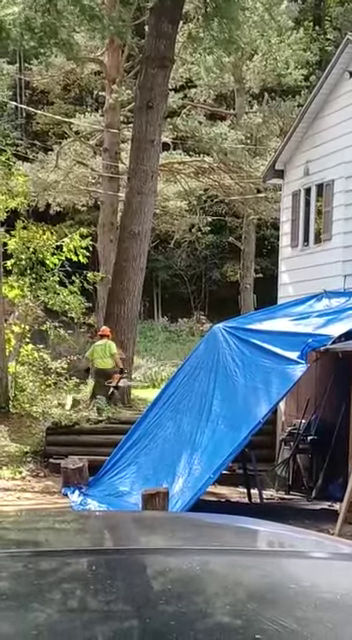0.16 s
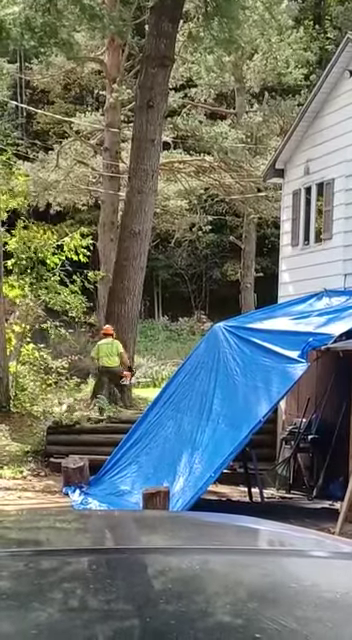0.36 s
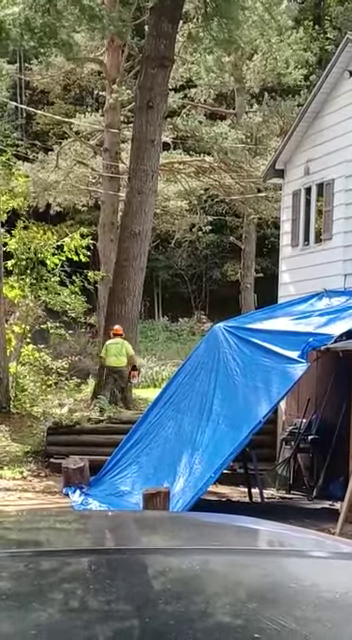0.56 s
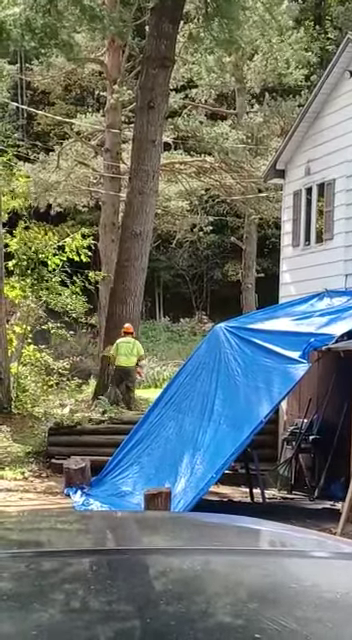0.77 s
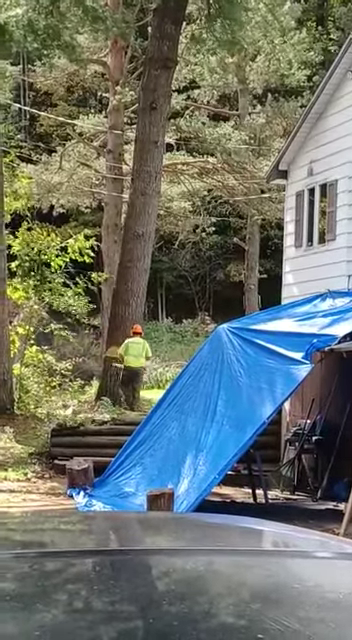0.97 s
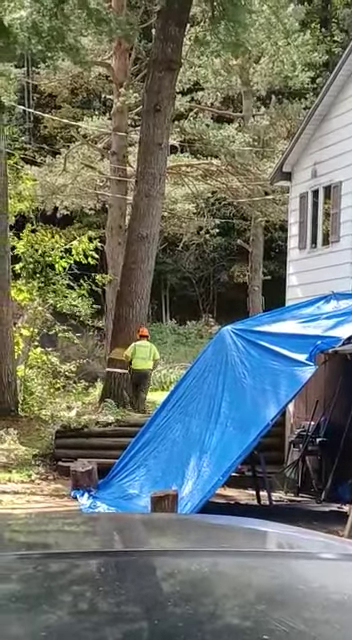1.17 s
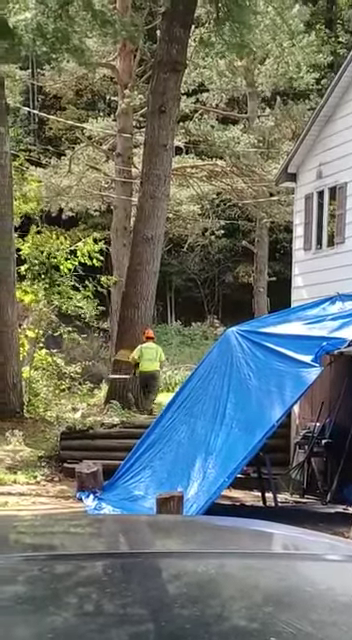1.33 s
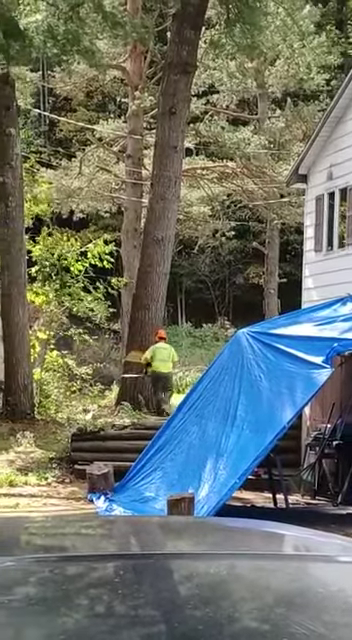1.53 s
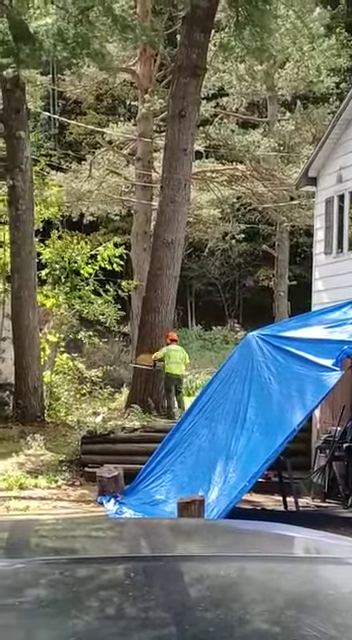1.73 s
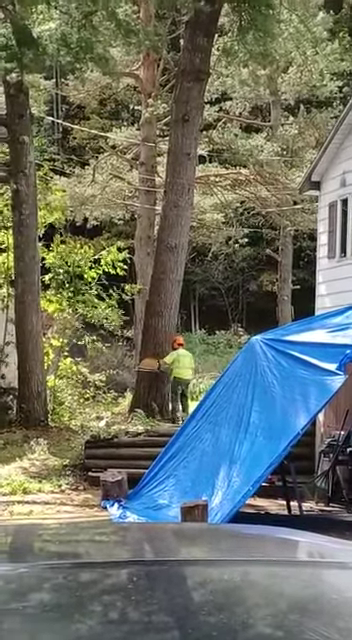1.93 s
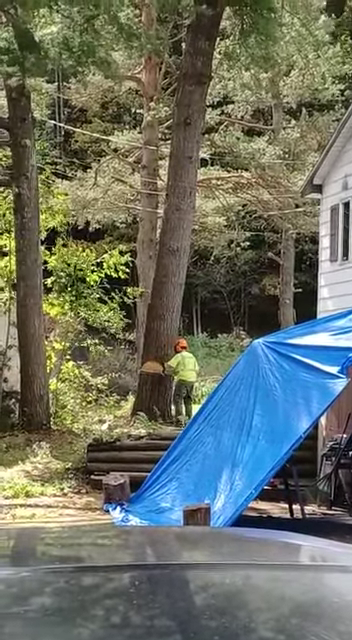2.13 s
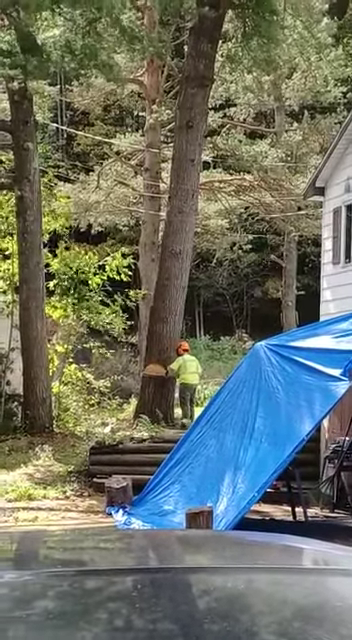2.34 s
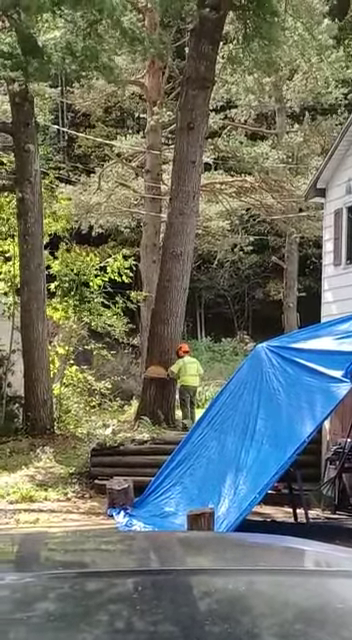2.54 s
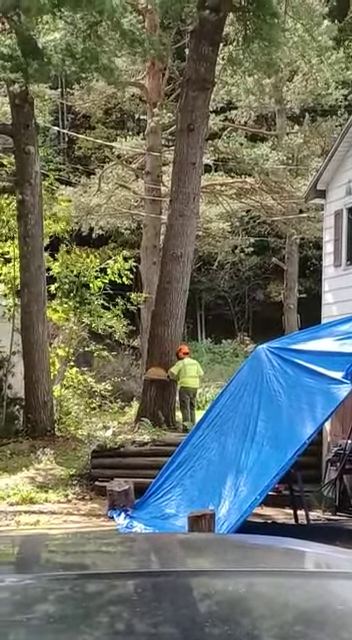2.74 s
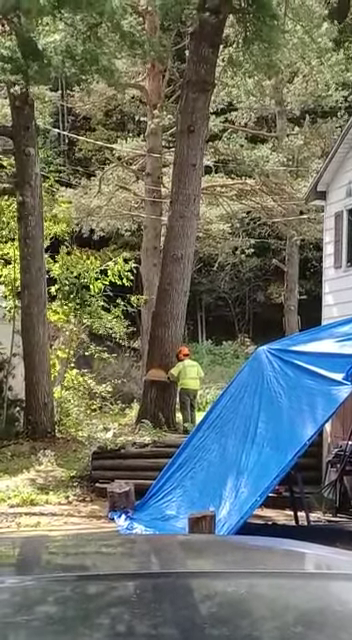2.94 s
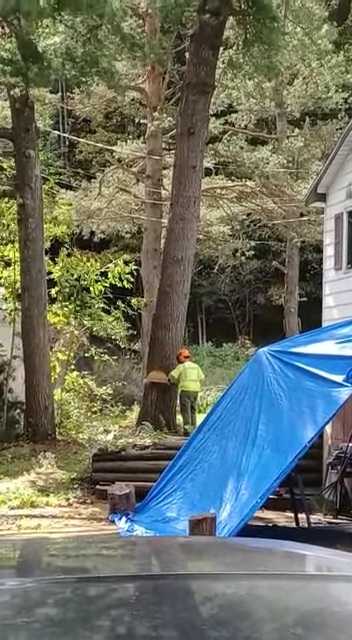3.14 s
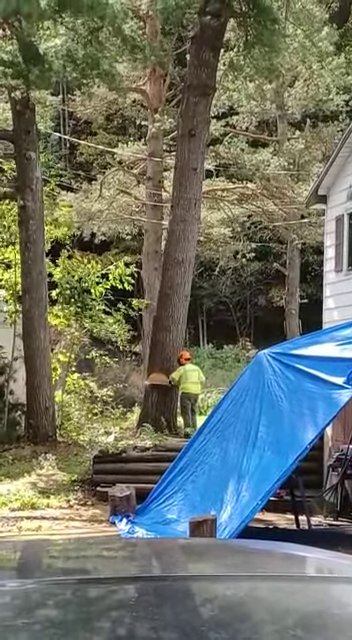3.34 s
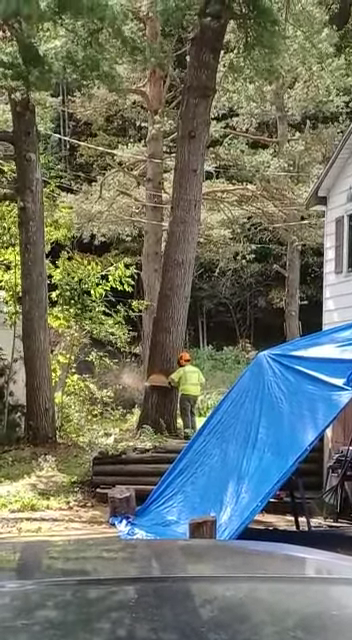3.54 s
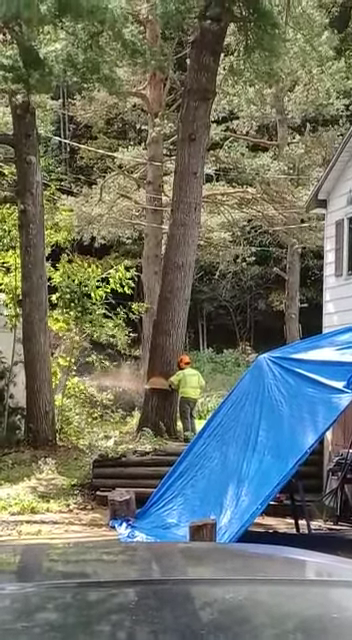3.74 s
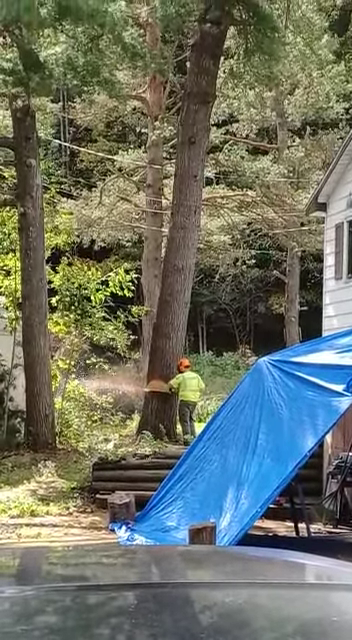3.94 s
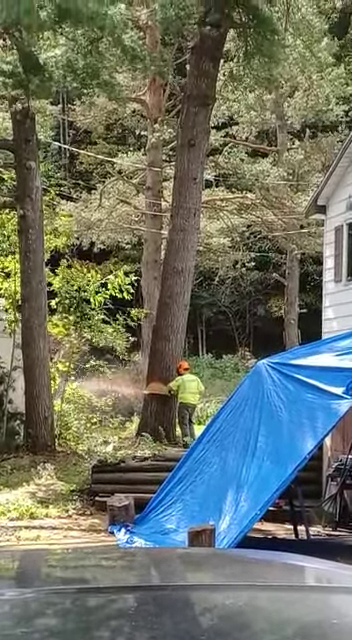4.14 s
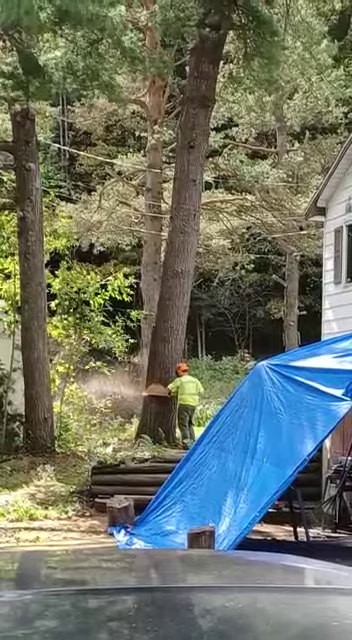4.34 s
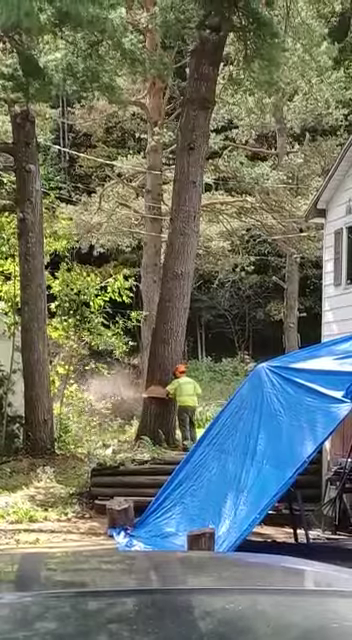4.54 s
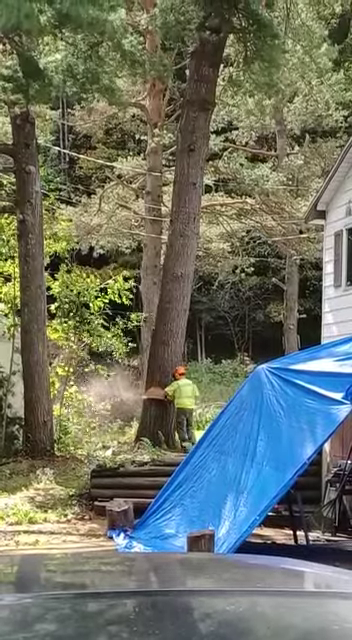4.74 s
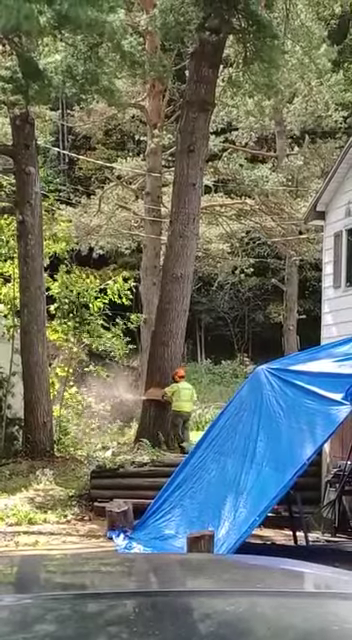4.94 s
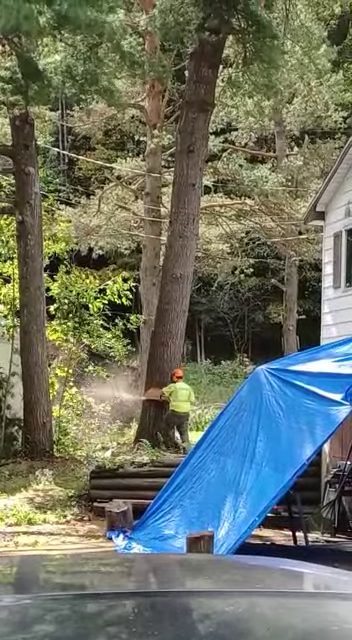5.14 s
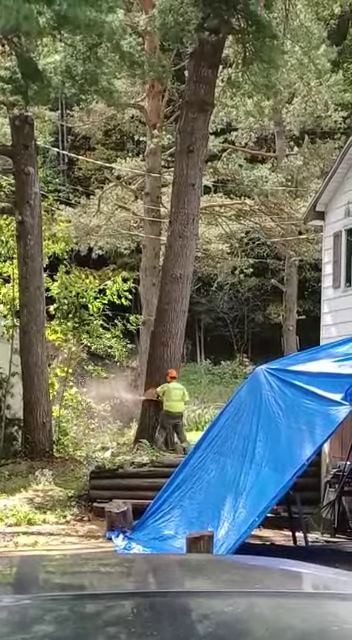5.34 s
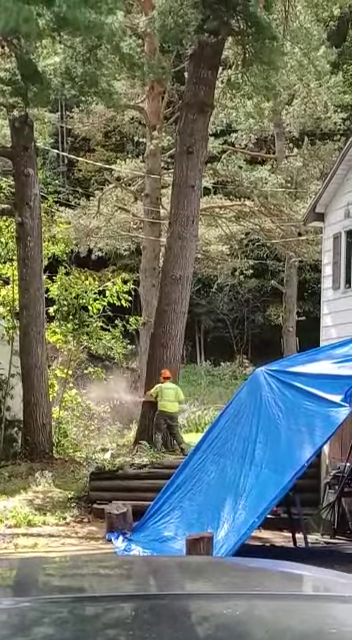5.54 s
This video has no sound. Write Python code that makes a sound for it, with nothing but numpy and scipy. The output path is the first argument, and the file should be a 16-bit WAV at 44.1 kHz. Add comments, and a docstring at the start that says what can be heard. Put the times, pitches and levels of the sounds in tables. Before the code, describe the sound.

A chainsaw some way off among trees idles, revs in four short blips, then cuts into a trunk at full throttle.

```python
"""A two-stroke chainsaw, some way off among trees, idles unevenly, its chain rattling on the bar.
Just after 2 s the engine catches with a pop and is revved in four short blips.
From about 3.2 s the throttle is held open and the chain bites into a trunk with a gritty hiss.
Late in the cut the wood pinches the chain and it squeals.
All along, the trees scatter the sound on its way to a phone with two microphone ports."""
import sys
import numpy as np
from scipy import signal
from scipy.fft import rfft, irfft, next_fast_len
from scipy.io import wavfile
from scipy.ndimage import uniform_filter1d, map_coordinates

SR = 44100
rng = np.random.default_rng(int(sys.argv[2]) if len(sys.argv) > 2 else 0)


def waveform_to_disk(signal):
    """Save audio, clipped to [-1, 1], as 16-bit WAV at the path in sys.argv[1]."""
    frames = np.transpose(np.atleast_2d(signal))
    scaled = np.clip(frames, -1, 1) * 32767
    samples = np.round(scaled).astype(np.int16)
    wavfile.write(sys.argv[1], SR, samples)


N = 251356
TIME_S = np.arange(N) / SR


def saw():
    """The whole saw: it idles until the first blip, then revs and cuts."""
    revved = np.clip((TIME_S - BLIPS[0][0]) / 0.0026, 0, 1)
    return (1 - revved) * idle() + jerks() + pop() + revved * (revving() + squeal())


# how far the chain is sunk in the wood: time_s, share (0-1)
BITE = [(3.22, 0.1), (3.6, 1)]
# loudness of each layer, by name: level_db at 150 Hz, rise_db_per_octave, throttle_shut_loss_db,
# in_wood_loss_db
LAYERS = {"bark": (-30.5, 4, 6.5, 1), "roar": (-34, 1, 1.5, 2.5), "honk": (-34, 4, 3, 10.5),
          "rasp": (-25.5, 9, 3, 2.5), "whine": (-32, 9, 0, 1)}
# tone of the whine: pitch_hz, level_db
WHINE = [(1200, -25.5), (1750, -8), (2200, -7), (2650, 2), (3100, -1.5), (3500, 2.5), (3800, -3), (4300, 2),
         (4700, -8), (5400, -6.5), (7000, -17)]
def revving():
    """The engine fires once a turn: it drones, barks and whines while the chain rasps."""
    speed_hz = shaft_speed()
    opening, strength_db = throttle()
    bite, = curves(BITE)
    level = {name: amp(db + per_octave * np.log2(speed_hz / 150) - shut * (1 - opening) - sunk * bite)
             for name, (db, per_octave, shut, sunk) in LAYERS.items()}
    turns = np.cumsum(speed_hz * (1 + .001 * wobble(30))) / SR
    # speeding up loads the engine and pulls the chain taut, fully at 80 Hz a second
    pull = np.clip(uniform_filter1d(np.gradient(speed_hz) * SR, SR // 16) / 80, 0, 1)
    # out of the wood the engine fires less evenly
    firing = overtones(turns, smear=.75) * amp((2.5 - 1.5 * bite) * wobble(120))
    engine = drone(turns, speed_hz, opening, bite) + exhaust(firing, turns, speed_hz, level, pull)
    whine = level["whine"] * coloured(firing + .6 * scattered(firing), WHINE)
    rasp = level["rasp"] * cutters(turns, pull)
    # the deepening cut swallows the chain's noise, 2.5 dB a second
    muffle = amp(-2.5 * np.maximum(TIME_S - BITE[-1][0], 0))
    bar_ring = amp(-35.5 - .9 * bite) * guide_bar(puffs(turns, depth_db=3))
    return amp(strength_db) * engine + muffle * (whine + rasp) + bite * sprocket(turns) + bar_ring


# engine speed with the throttle held open: time_s, speed_hz
CUT_SPEED = [(3.17, 116.4), (3.31, 152.1), (3.38, 166.6), (3.44, 171.7), (3.5, 183.9), (3.58, 194),
             (3.69, 193), (4.03, 183.5), (4.32, 193.3), (4.55, 197.3), (4.9, 219.3), (4.99, 221.1),
             (5.17, 222.4), (5.29, 214.7), (5.43, 218), (5.69, 205.4)]
def shaft_speed():
    """Turns a second: the shaft speeds up in each blip, coasts down, and at last pulls into the cut."""
    first_hz, overrun_s, coast_hz_per_s = 66.03, .02, 120
    open_s, shut_s, top_hz, *_ = np.transpose(BLIPS)
    top_s = shut_s + overrun_s
    low_hz = np.r_[first_hz, top_hz[:-1] - coast_hz_per_s * (open_s[1:] - top_s[:-1])]
    return curves(sorted([*zip(open_s, low_hz), *zip(top_s, top_hz), *map(tuple, CUT_SPEED)]))[0]


# short squeezes of the throttle: open_s, shut_s, top_speed_hz, strength_db, rise_s
BLIPS = [(2.155, 2.268, 87.02, 1, 0.0092), (2.382, 2.502, 127.1, 1.5, 0.038),
         (2.681, 2.776, 125.8, -1, 0.053), (2.926, 3.03, 134.1, -1, .045)]
def throttle():
    """How far the throttle is open (0-1), and how much each blip adds to the engine in dB."""
    open_s, shut_s, _, strength_db, rise_s = np.transpose(BLIPS)
    rising = np.clip((TIME_S[:, None] - open_s) / rise_s, 0, 1)
    falling = np.clip(1 - (TIME_S[:, None] - shut_s) / 0.034, 0, 1)
    blips = rising * falling
    held = np.clip((TIME_S - CUT_SPEED[0][0]) / .033, 0, 1)
    return blips.sum(axis=1) + held, blips @ strength_db


# low tones at 1, 2 and 4 times the shaft speed, throttle open: speed_hz, level_db
TONE_1 = [(68, -50), (88, -33), (108, -22), (130, -22), (151, -35), (169, -25), (183, -28), (193, -21.5),
          (222, -21.5)]
TONE_2 = [(70, -39), (88, -39.5), (115, -32), (150, -39), (184, -26.5), (193, -32), (199, -25), (206, -31),
          (222, -22.5)]
TONE_4 = [(75, -54), (113, -34.5), (135, -44), (160, -30.5), (170, -43), (185, -33), (194, -35), (197, -39),
          (208, -27.5), (217, -32.5), (222, -46)]
def drone(turns, speed_hz, opening, bite):
    """The engine's low tones swell and fade as they slide through fixed resonances."""
    tones = sum(amp(along(table, speed_hz)) * np.sqrt(2) * np.cos(2 * np.pi * k * turns)
                for k, table in ((1, TONE_1), (2, TONE_2), (4, TONE_4)))
    return tones * amp(-9 * (1 - opening) + 1.12 * (1.5 - bite) * wobble(60))


def overtones(turns, smear):
    """The higher tones of the firing, each wavering on its own; smear spreads the pulse out."""
    stack = 0
    for k in (3, *range(5, 37)):
        swell = amp(2.5 * wobble(7))
        stack += swell * np.cos(2 * np.pi * (k * turns + smear * rng.random()) + .22 * wobble(50))
    return unit(stack * np.sqrt(np.gradient(turns)))


# tone of the exhaust's bark, roar and growl: pitch_hz, level_db
BARK = [(130, -19), (218, 21), (280, -5), (370, -4), (440, 13), (560, -4.5), (650, -0.5), (760, 2),
        (950, -2), (1130, -7), (1300, -4), (1600, -8.5), (5000, -64)]
ROAR = [(30, -55), (80, -8), (400, -6.5), (800, 0.5), (950, 1), (1120, 6), (1400, -10), (2000, -5),
        (3000, -5), (6000, -14)]
GROWL = [(520, -25), (680, 1), (850, 1.5), (1180, -4), (1400, -9.5), (1700, -27), (2500, -7), (3200, -17)]
# where the muffler's shell rings: pitch_hz, width_hz, level_db
MUFFLER_SHELL = [(1126, 72, 2.5), (800, 150, -7.5)]
def exhaust(firing, turns, speed_hz, level, pull):
    """Exhaust pulses bark, roar and make the muffler honk; they growl near one shaft speed."""
    growl_hz, growl_width_hz = 167.4, 14
    bark = level["bark"] * coloured(firing + .5 * scattered(firing), BARK)
    roar = level["roar"] * coloured(puffs(turns, depth_db=-6), ROAR)
    honk = level["honk"] * unit(resonant(firing + .6 * puffs(turns, depth_db=5), MUFFLER_SHELL))
    nearness = np.exp(-((speed_hz - growl_hz) / growl_width_hz) ** 2)
    growl = nearness * amp(-29.5) * coloured(firing, GROWL)
    return amp(0.5 * pull) * (bark + roar + honk) + growl


def pop():
    """The first full charge of fuel fires with a pop as the throttle opens."""
    burst = bursts(np.array([BLIPS[0][0] + .004]), [-35], rise_s=0.0025, fade_s=0.21)
    return burst * (coloured(rng.standard_normal(N), ROAR) + 1.6 * guide_bar(rng.standard_normal(N)))


# tone of the chain's rasp and of its steely zing: pitch_hz, level_db
RASP = [(900, -25), (1900, -6.5), (2300, -9), (2550, -4.5), (3300, -6.5), (4200, -2.5), (5200, -3),
        (6500, -7), (8000, -14.5), (9500, -8.5), (11200, -2), (13500, -11), (15700, -16)]
ZING = [(2600, -28), (3400, -7), (3880, 4), (4150, -24), (4600, -30)]
def cutters(turns, pull):
    """The cutters tear a gritty hiss from the wood; pulled taut, the chain's steel sings."""
    grit = puffs(turns, depth_db=-1.5) * amp(0.83 * wobble(1500) + 1.1 * wobble(60))
    rough_tone = np.cos(2 * np.pi * (31.8 * turns + .5 * wobble(280)))
    zing = filtered(rough_tone, lambda hz: amp(along(ZING, hz)))
    return coloured(grit, RASP) + amp(1.5) * pull * zing


# tones of the wheel that drives the chain: cycles_per_turn, level_db
SPROCKET_TONES = [(7, -8), (14, 0), (21, -4), (28, -12)]
# how they swell and fade together: time_s, level_db
SPROCKET_LEVEL = [(3.35, -24), (3.58, -27.5), (3.9, -45), (4.15, -36), (4.5, -32), (4.62, -26.5),
                  (4.85, -34.5), (5.1, -29.5), (5.6, -39)]
def sprocket(turns):
    """Seven teeth catch the chain's links and sing, a little unsteadily."""
    tones = sum(amp(db + 2 * wobble(12)) * np.cos(2 * np.pi * k * turns + .3 * wobble(60))
                for k, db in SPROCKET_TONES)
    return amp(curves(SPROCKET_LEVEL)[0]) * tones


# loudness of the pinched chain: time_s, level_db
PINCH = [(4.3, -58), (4.75, -38), (5.7, -37)]
# where it rings: pitch_hz, width_hz, level_db
SQUEAL = [(4340, 150, 0)]
def squeal():
    """The cut closes on the chain and makes it sing in fits."""
    return amp(curves(PINCH)[0] + 2 * wobble(14)) * unit(resonant(rng.standard_normal(N), SQUEAL))


# the idling engine: time_s, speed_hz, hum_db, effort_db
IDLE = [(0, 56.04, -42, 2), (.3, 57.1, -40, 1.5), (.5, 59.15, -51, -0.5), (.9, 56.97, -44, -0.5),
        (1.15, 57.43, -52.5, -0.5), (1.45, 61.16, -49.5, 1), (2.14, 59.08, -51, 2.5)]
# tone of its chug and its clatter: pitch_hz, level_db
CHUG = [(30, -38), (100, 1.5), (170, -2), (320, -4.5), (480, -12.5), (3000, -33.5)]
CLATTER = [(250, -17), (450, -3.5), (900, 3.5), (1250, -4.5), (2100, -1.5), (6000, -48)]
# how freely the bar rings at idle: time_s, level_db
BAR_RING = [(.4, -2.5), (.8, 1), (1.7, 2)]
def idle():
    """The engine ticks over: a hum in the muffler, soft chugs and a loose chain."""
    speed_hz, hum_db, effort_db = curves(IDLE)
    fire_s = np.array(FIRINGS)[:, 0]
    # each stray firing throws the shaft forward and breaks up the hum
    kick = bursts(fire_s - .008, np.zeros(len(fire_s)), rise_s=0.0059, fade_s=0.086)
    turns = np.cumsum(speed_hz * (1 + 0.25 * (kick - uniform_filter1d(kick, SR // 10)))) / SR
    throb_db = -56 + 3.7 * (speed_hz - speed_hz.mean())
    throb = amp(throb_db + 1.7 * wobble(24.6)) * np.sin(4 * np.pi * turns)
    hum = amp(hum_db + 4 + 2 * wobble(30)) * np.sin(8 * np.pi * turns)
    strokes = scattered(pulses(turns, scatter_s=0.00037, size_db=2)) + 1.53 * puffs(turns, depth_db=-5)
    chug = amp(-45.5) * coloured(strokes, CHUG)
    clatter = amp(-49.5) * coloured(puffs(turns, depth_db=-1.5), CLATTER)
    links = puffs(turns, depth_db=2.2) * amp(1.7 * wobble(700))
    rattle = amp(-40) * guide_bar(links, ring=amp(curves(BAR_RING)[0]))
    return amp(3.5 - 18 * kick) * (throb + hum) + amp(effort_db) * (chug + clatter + rattle)


# stray firings at idle, with relative levels: start_s, slap_db, thump_db
FIRINGS = [(0.0064, -26.5, -32.5), (0.0782, -33, -44), (0.2374, -25.5, -44), (0.292, -24.5, -40),
           (0.3607, -22, -43), (0.4604, -27.5, -40), (0.5438, -28, -37), (1.0256, -36, -52),
           (1.2358, -30, -36), (1.3195, -26, -36), (1.4196, -24, -40), (1.5177, -26, -45),
           (1.6023, -29, -54), (1.6783, -25.5, -38), (1.7537, -26, -40), (1.813, -26, -34),
           (1.9028, -22.5, -30), (2.0014, -26, -28), (2.1028, -25.5, -30.5)]
# tone of steel hitting steel: pitch_hz, level_db
TICK = [(2000, -25), (4000, -5), (7000, -11), (11000, 5), (15500, -8)]
def jerks():
    """Each stray firing thumps in the muffler and slaps the slack chain against the bar."""
    fire_s, slap_db, thump_db = np.transpose(FIRINGS)
    slaps = bursts(fire_s, slap_db - 4, rise_s=0.00088, fade_s=0.061)
    ticks = bursts(fire_s + 0.0022, slap_db - 7.5, rise_s=.0004, fade_s=0.014)
    thumps = bursts(fire_s - .006, thump_db + 1.5, rise_s=0.0085, fade_s=0.12)
    contacts = lambda: rng.standard_normal(N) * amp(4.3 * wobble(800))
    # hard hits are brighter than the steady rattle
    chain = unit(filtered(guide_bar(contacts()), lambda hz: 1 + 1.06 * np.minimum(hz / 10000, 1) ** 2))
    steel = coloured(contacts(), TICK)
    muffler = coloured(rng.standard_normal(N), CHUG)
    return slaps * chain + ticks * steel + thumps * muffler


# where the bar rings: pitch_hz, width_hz, level_db
BAR = [(1600, 81, -14.5), (2545, 83, 11.5), (2795, 87, 6), (4210, 77, -1.5), (5250, 240, -5.5),
       (10400, 280, 4), (13450, 160, -7)]
# tone of the chain's rattle: pitch_hz, level_db
RATTLE = [(400, -44), (1500, -3.5), (2300, -6.5), (3000, -1), (3600, 0), (5500, -6), (7000, -12),
          (8200, -16.5), (9500, -22.5), (12000, -16), (15500, -41)]
def guide_bar(x, ring=1):
    """Chain noise rings in the steel bar that the chain runs around."""
    return coloured(x + ring * resonant(x, BAR), RATTLE)


def puffs(turns, depth_db):
    """Noise that swells once a turn of the shaft."""
    return unit(rng.standard_normal(N) * amp(depth_db * np.cos(2 * np.pi * turns)))


def pulses(turns, scatter_s, size_db):
    """One pulse a turn, each a little early or late and of its own size."""
    at = np.interp(np.arange(1, int(turns[-1])), turns, np.arange(N))
    chance = rng.standard_normal((len(at), 2))
    at = at + scatter_s * SR * chance[:, 0]
    # a click spread over 16 samples can fall between two of them
    taps = np.floor(at)[:, None] + np.arange(-7, 9)
    offset = taps - at[:, None]
    shape = np.sinc(offset) * np.cos(np.pi * offset / 16) ** 2
    size = amp(size_db * chance[:, 1]) * np.sqrt(np.abs(np.gradient(at)))
    samples = np.clip(taps, 0, N - 1).astype(int)
    return unit(np.bincount(samples.ravel(), (shape * size[:, None]).ravel(), N))


def bursts(start_s, levels_db, rise_s, fade_s):
    """A loudness curve that swells at each start, then falls 60 dB in fade_s."""
    age_s = np.clip(TIME_S[:, None] - start_s, 0, 1)
    return ((1 - np.exp(-age_s / rise_s)) * amp(-60 * age_s / fade_s)) @ amp(levels_db)


def wobble(rate_hz):
    """A smooth random curve through rate_hz new values a second."""
    knots = rng.standard_normal(int(N * rate_hz / SR) + 4)
    fine = np.arange(0, len(knots) - 1, 1 / 8)
    return np.interp(TIME_S * rate_hz, fine, map_coordinates(knots, [fine]))


def resonant(x, modes):
    """Make x ring at each pitch in a table."""
    return filtered(x, lambda hz: sum(amp(db) * 1j * hz * width / (pitch**2 - hz**2 + 1j * hz * width)
                                      for pitch, width, db in modes))


def coloured(x, tone):
    """Shape x with a tone table, then scale it to a standard level."""
    return unit(filtered(x, lambda hz: amp(along(tone, hz))))


def filtered(x, response):
    """Multiply each frequency in x by response(hz)."""
    size = next_fast_len(N + SR // 2)
    return irfft(rfft(x, size) * response(np.fft.rfftfreq(size, 1 / SR)), size)[..., :N]


def curves(rows):
    """One value per sample for each column after the time."""
    time_s, *columns = np.transpose(rows)
    return [np.interp(TIME_S, time_s, column) for column in columns]


def along(points, hz):
    """Read a table between its pitches, on a log scale."""
    pitch_hz, values = np.transpose(points)
    return np.interp(np.log(hz + 1), np.log(pitch_hz + 1), values)


def amp(db):
    """Decibels to gain."""
    return 10 ** (np.asarray(db) / 20)


def unit(x):
    """Scale to an average (rms) level of 1."""
    return x / np.sqrt(np.mean(x ** 2) + 1e-20)


# how long echoes take to fall 60 dB, before their tone is evened out: pitch_hz, fade_s
WOODS = [(200, 0.45), (2000, 0.27), (10000, 0.31)]
def scattered(x):
    """Trunks and leaves smear the sound in time, longest in the bass."""
    hz, time_s, noise = signal.stft(rng.standard_normal(SR // 2), SR, nperseg=256)
    fading = noise * amp(-60 * time_s / along(WOODS, hz)[:, None])
    spectrum = rfft(signal.istft(fading, SR, nperseg=256)[1], SR)
    echo = irfft(spectrum / np.abs(spectrum))[:SR // 2]  # even out the tone
    return signal.fftconvolve(x, echo)[:N]


# how much diffuse echo is heard; the phone's microphones drop it near 8 kHz: pitch_hz, share (0-1)
ECHO_HEARD = [(100, 0.023), (250, 0.2), (600, 0.34), (2500, 0.36), (7200, 0.69), (7600, 0.016), (8200, .03),
              (8500, 0.5), (15000, 0.76)]
def scene():
    """The saw plus as much of the trees' echo as the phone picks up, different left and right."""
    direct = saw()
    echo = filtered(scattered(saw()), lambda hz: along(ECHO_HEARD, hz))
    return np.array([direct + echo, direct - echo])


# how much louder the left port is than the right: pitch_hz, level_db
LEFT_LEVEL = [(100, -1.5), (230, -2.5), (400, 3), (800, -0.5), (2000, -0.5), (2700, -3), (4300, -8.5),
              (6400, -5), (7300, -3.5), (8200, 3), (8500, -10), (11000, -16), (13300, -13.5), (15500, -10)]
# how far the left port's wave runs ahead: pitch_hz, phase_rad
LEFT_LEAD = [(300, 0), (1000, -.6), (2700, -1.4), (7200, -1.5), (7600, -3.14), (8300, -3.14), (9000, -3)]
def record(dry):
    """The two microphone ports differ in level and phase; nothing above 15800 Hz is kept."""
    def ports(hz):
        tilt = amp(along(LEFT_LEVEL, hz) / 2) * np.exp(.5j * along(LEFT_LEAD, hz))
        pair = np.array([tilt, 1 / tilt])
        return pair / np.sqrt(np.mean(np.abs(pair) ** 2, axis=0))
    return filtered(filtered(dry, ports), lambda hz: hz < 15800)


dry = scene()
out = record(dry)
waveform_to_disk(out)
```